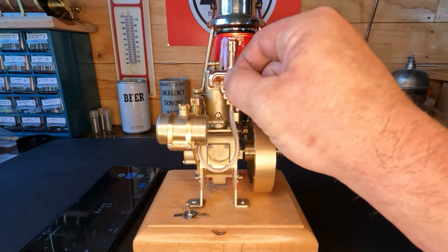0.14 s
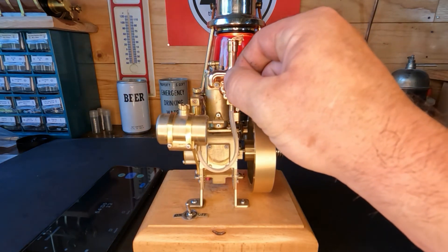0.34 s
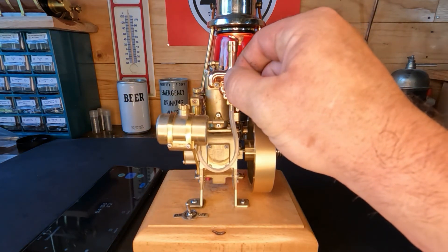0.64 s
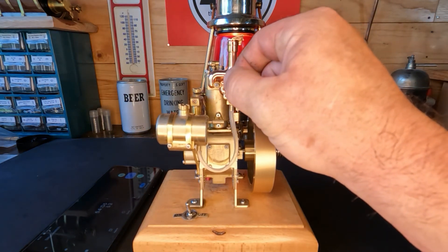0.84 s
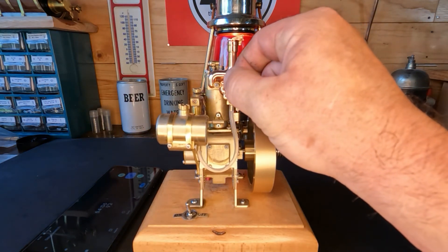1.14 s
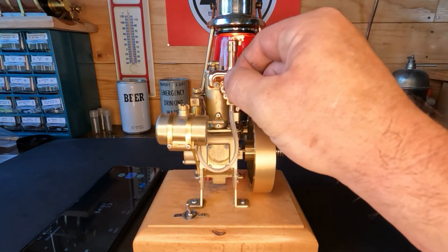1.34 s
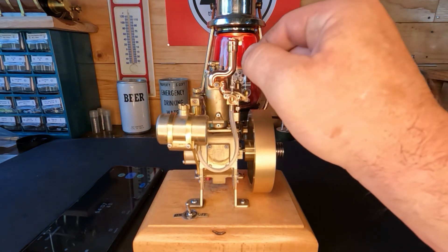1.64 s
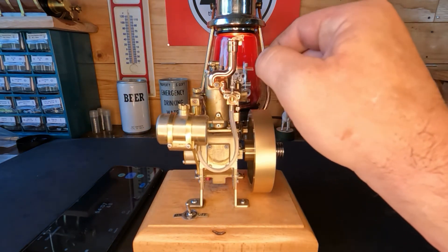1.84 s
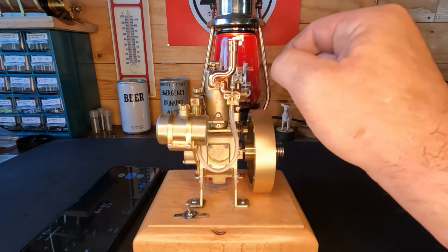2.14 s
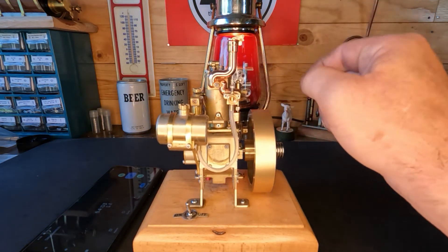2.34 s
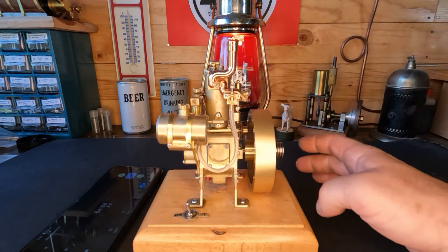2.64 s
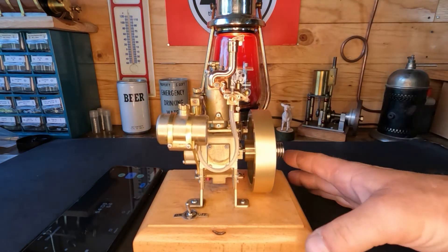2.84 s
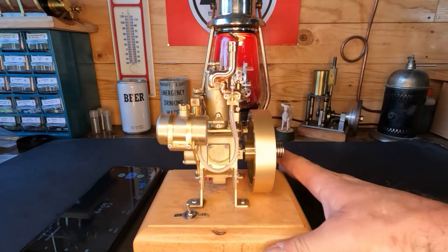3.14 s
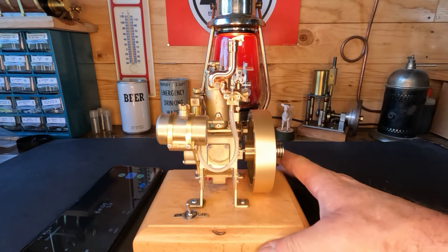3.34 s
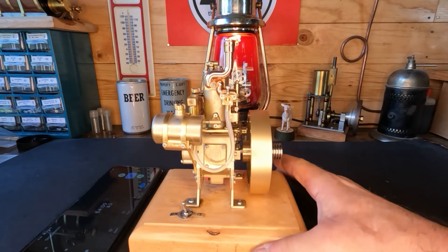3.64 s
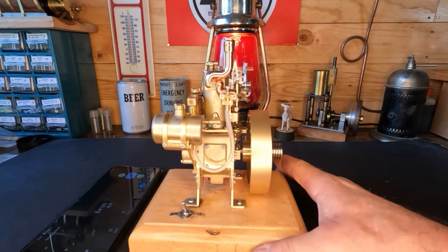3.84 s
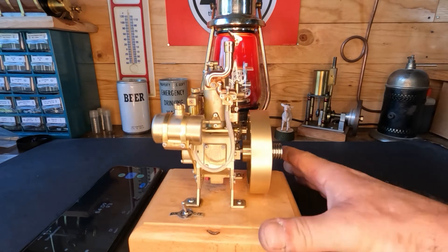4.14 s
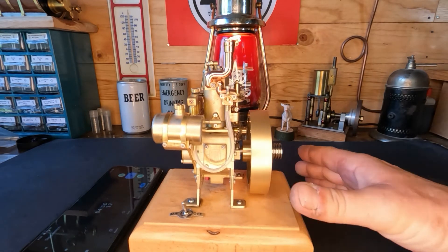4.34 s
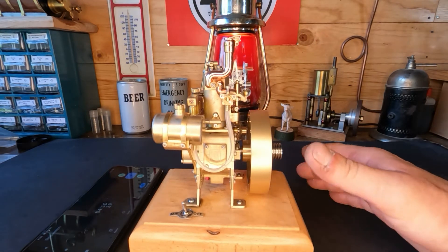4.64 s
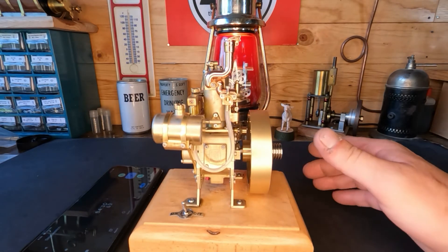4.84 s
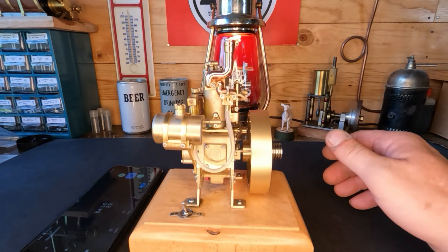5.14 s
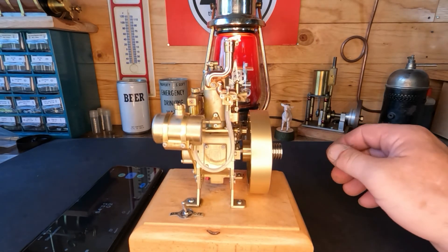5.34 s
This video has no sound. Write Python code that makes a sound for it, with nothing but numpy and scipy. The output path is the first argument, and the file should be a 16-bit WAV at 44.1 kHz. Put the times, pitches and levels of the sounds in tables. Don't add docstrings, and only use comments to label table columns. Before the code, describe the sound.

Up close, a tiny hit-and-miss engine pops rapidly, then slows to irregular cracks separated by soft chuffing, metallic ticks and valve snorts.

```python
import sys
import numpy as np
from scipy import signal
from scipy.fft import rfft, irfft, next_fast_len
from scipy.io import wavfile
from scipy.ndimage import uniform_filter1d, map_coordinates

SR = 44100
rng = np.random.default_rng(int(sys.argv[2]) if len(sys.argv) > 2 else 0)


def ratio_of_db(decibels):
    return 10 ** (np.asarray(decibels, float) / 20)


def output_pcm(signal):
    pcm = np.clip(np.atleast_2d(signal).T, -1, 1) * 32767
    wavfile.write(sys.argv[1], SR, np.round(pcm).astype(np.int16))


N = 241917
T = np.arange(SR // 6) / SR


def unit(x):
    return x / np.sqrt(np.mean(x ** 2) + 1e-20)


def along(points, hz):
    f, v = np.transpose(points)
    return np.interp(np.log(hz + 1), np.log(f + 1), v)


def wobble(rate):
    knots = rng.standard_normal(int(N * rate / SR) + 4)
    return map_coordinates(knots, [np.arange(N) * rate / SR])


def filtered(x, response):
    m = next_fast_len(x.shape[-1] + 8192)
    return irfft(rfft(x, m) * response(np.fft.rfftfreq(m, 1 / SR)), m)[..., :x.shape[-1]]


def resonant(x, peaks):
    def shape(f):
        total = 0
        for k, (center, width, db) in enumerate(peaks):
            damping = 1j * f * width
            total = total + (-1) ** k * ratio_of_db(db) * damping / (center * center - f * f + damping)
        return total
    return unit(filtered(x, shape))


def hiss(peaks, size):
    return resonant(rng.standard_normal(size), peaks)


def ring(modes, scatter_db, delay=0):
    t = np.clip(T - delay, 0, None)
    out = np.zeros(len(T))
    for hz, db, t60 in modes:
        level_db = db + scatter_db * rng.normal()
        out += ratio_of_db(level_db - 60 * t / t60) * np.sin(2 * np.pi * hz * t)
    return out


def burst(start, rise, t60):
    t = np.clip(T - start, 0, None)
    return (1 - np.exp(-t / rise)) * ratio_of_db(-60 * t / t60)


def add(out, s, sound):
    i = max(round(s * SR), 0)
    out[i:i + len(sound)] += sound[:len(out) - i]


# (frequency [Hz], level per Hz [dB])
AIR = [(25, -22), (58, -56), (250, -24), (754, -52), (1000, -7.5), (5000, -7), (11000, -15), (16000, -56)]


def still_air():
    return unit(filtered(rng.standard_normal((2, N)), lambda hz: ratio_of_db(along(AIR, hz))))


# (frequency [Hz], time to fall 60 dB [s])
SHOP = [(150, 0.14), (1000, 0.23), (10000, 0.073)]


def shop(x):
    hz, t, z = signal.stft(rng.standard_normal((2, SR // 3)), SR, nperseg=256)
    fade = ratio_of_db(-60 * t / along(SHOP, hz)[:, None])
    tail = signal.istft(z * fade, SR, nperseg=256)[1]
    late = np.pad(x, (220, 0))[None]
    return signal.fftconvolve(late, tail / np.linalg.norm(tail[0]), axes=1)[:, :N]


FIRED = [2, 4, 6, 8, 10, 18, 26, 33, 42, 43, 53, 56, 68, 69]


def cam():
    pop_lag_s, sag_per_s2 = .0205, 2.5
    ticks = [(pop[0] - pop_lag_s, n) for pop, n in zip(POPS, FIRED)]
    first, last = (-.077, -1), (5.569, 75)
    s, turns = np.transpose([first, *ticks, last])
    t = np.arange(N) / SR
    k = np.searchsorted(s, t) - 1
    since, span = t - s[k], np.diff(s)[k]
    even = turns[k] + np.diff(turns)[k] * since / span
    return even + sag_per_s2 / 2 * since * (span - since)


def sealed():
    depth_db, cycle = np.zeros(N), cam()
    seal_db = -15

    def hush(length, db):
        return db * np.sin(np.pi * np.clip(T / length, 0, 1)) ** .5

    for s, *_ in SNORTS:
        at = cycle[round(s * SR)]
        if .35 < at % 1 < .9:
            shut = s + .014
            opens = np.searchsorted(cycle, np.ceil(at) + .12) / SR
            add(depth_db, shut, hush(opens - shut, seal_db))
    for k in np.flatnonzero(np.diff(FIRED) == 1):
        add(depth_db, POPS[k + 1][0], hush(.1, -14))
    for s, *_ in POPS:
        add(depth_db, s + .008, hush(.045, -6))
    return ratio_of_db(np.maximum(depth_db, seal_db - 4))


# (time [s], level [dB])
BREATH = [(0.0, -50.5), (0.78, -49), (1.11, -44), (1.39, -44), (1.59, -42), (2.9, -41), (3.11, -40.5),
          (3.25, -42), (3.42, -44), (3.6, -43.5), (4.59, -41), (4.95, -41.5), (5.14, -44.5), (5.48, -43)]
# (place [cycles], width [cycles], port level [dB], pipe level [dB], gear level [dB])
STROKES = [
    (.1, .05, -3, -9, -7),
    (.2, .03, -16, -7, -9),
    (.36, .04, 0, 1, 0),
    (.44, .03, -5, -9, -6),
    (.6, .055, -2, -5, -3),
    (.9, .04, -1, -10, -4),
]
# (beats [per cycle], level [dB], lead [turns])
PUMP = [(1, -24, 0), (2, 0, .24), (4, -4.5, -.1), (6, -17, -.29), (8, -20, -.1), (10, -22, .2)]
# (frequency [Hz], width [Hz], level [dB])
PORT = [(3420, 1150, -6), (5263, 770, 0.5), (6280, 650, -8), (7465, 750, -0.5), (9380, 590, -12.5),
        (10690, 760, -11), (12140, 1500, -19.5)]
# (frequency [Hz], width [Hz], level [dB])
PIPE = [(147.6, 26, -2), (360.6, 55, -7.5), (524, 84, -11), (949.5, 110, 2.5)]
# (frequency [Hz], width [Hz], level [dB])
GEAR = [(1250, 400, -2.5), (1860, 360, -0.5), (2633, 395, -5), (3840, 500, -13)]
# (frequency [Hz], level [dB], time to fall 60 dB [s])
TICK = [(6350, 0, .013), (5500, -3, .01), (7500, -1, .01), (2000, -3, .012), (1000, -8, .02),
        (370, -12, .03), (620, -10, .02), (10600, -10, .006)]
# (frequency [Hz], level [dB], time to fall 60 dB [s])
TOCK = [(5400, 2, .016), (6400, -8, .01), (1000, -6, .02), (2000, -2, .012), (370, -7, .03), (620, -5, .02),
        (10600, -9, .006)]


def coasting():
    cycle, sealed_gain = cam(), sealed()
    flow_db = np.interp(np.arange(N) / SR, *np.transpose(BREATH))
    flow_db = flow_db - flow_db.mean()
    port_db, pipe_db = -41 + flow_db, -40 + .52 * flow_db
    gear_db, pump_db = -42.5 + .97 * flow_db, -34.5 + .44 * flow_db

    gates = ratio_of_db([[-15], [-9], [-4]]) * np.ones((3, N))
    for at, width, *level_db in STROKES:
        off = (cycle - at + .5) % 1 - .5
        gates += ratio_of_db(level_db)[:, None] * np.exp(-.5 * (off / width) ** 2)

    jets = np.zeros(N)
    for hz, width, db in PORT:
        flutter = ratio_of_db(db + 3 * wobble(220)) * np.sqrt(width)
        jets += flutter * resonant(hiss([(hz, width, db)], N), [(hz, 3 * width, 0)])
    port = ratio_of_db(port_db) * unit(gates[0] * jets)
    block_hum = ratio_of_db(-13) * np.sqrt(gates[2]) * hiss(PIPE[:3], N)
    pipe = ratio_of_db(pipe_db) * unit(gates[1] * hiss(PIPE[3:], N) + block_hum)
    gear = ratio_of_db(gear_db) * unit(gates[2] * ratio_of_db(.73 * wobble(250)) * hiss(GEAR, N))
    pump = np.zeros(N)
    for beats, db, lead in PUMP:
        pump += ratio_of_db(db + wobble(5.1)) * np.cos(2 * np.pi * (beats * cycle + lead))
    out = sealed_gain * port + sealed_gain ** .6 * gear + pipe + ratio_of_db(pump_db) * unit(pump)

    contact = np.floor(2 * (cycle + .025))
    for i in np.flatnonzero(np.diff(contact)):
        second = contact[i + 1] % 2
        level = ratio_of_db(port_db[i] + 19 - 4 * second) * sealed_gain[i]
        click = ring(TOCK if second else TICK, 1.8)
        add(out, i / SR, level * burst(0, .0006, .024) * click)
    return out


# (time [s], level [dB])
LATCH_SLIPS = [
    (3.159, -26),
    (5.024, -22),
]


def leaks():
    out = np.zeros(N)
    lead_s = .017
    window = burst(0, .0012, .12) * np.clip((lead_s - T) / .004, 0, 1)
    lifts = [(s - lead_s, leak_db) for s, *_, leak_db in POPS]
    for s, *_ in PUFFS:
        if any(.03 < s - snap[0] < .065 for snap in SNORTS):
            lifts.append((s - lead_s, -29.5))
    for s, db in lifts + LATCH_SLIPS:
        jet_db = min(-29, db - 4.5)
        song = ratio_of_db(db - 9.5) * hiss(PIPE[3:], len(T))
        jet = ratio_of_db(jet_db - 7.5) * hiss(GEAR, len(T)) + ratio_of_db(jet_db - 14.5) * hiss(PORT, len(T))
        add(out, s, window * (song + jet))
    return out


# (time [s], puff level [dB], rasp level [dB], thud level [dB])
PUFFS = [(0.03, -20.5, -4, -17), (0.119, -23.5, -1.5, -18), (0.298, -21, -6, -23), (0.468, -21.5, -4, -14),
         (0.631, -26.5, -2, -9), (0.789, -22.5, -3, -14), (1.386, -21.5, 1, -16), (1.978, -20, -4, -11),
         (2.125, -19.5, -1.5, -18), (3.369, -22.5, -4, -20), (3.847, -19.5, -8, -7.5), (3.95, -24, 1, -19),
         (4.507, -19.5, -2.5, -17), (4.862, -14, -31, -9), (5.231, -23.5, -6, -16)]


def puffs():
    out = np.zeros(N)
    for s, db, rasp_db, thud_db in PUFFS:
        push = ring([(232, -3, .0067), (514, -8, .0093)], .97, .0021)
        suction = ring([(107, 3.5, .03), (65, -2, .065)], 1, .0032)
        thud = ratio_of_db(thud_db + 5.5) * (push - suction)
        knock_modes = [(422, 12.1, .012), (832, 6.6, .011), (1250, 2.8, .019)]
        knock = burst(.0029, .0022, .24) * ring(knock_modes, 2.3, .00334)
        rasp = burst(.0005, .0043, .033) * hiss(GEAR + THROAT, len(T))
        add(out, s, ratio_of_db(db + 2.5) * (thud + ratio_of_db(rasp_db + .5) * (knock + ratio_of_db(.5) * rasp)))
    return out


# (time [s], ring level [dB], ring frequency [Hz], flutter level [dB])
SNORTS = [(0.051, -31, 1320, -32.5), (0.1436, -30, 1250, -32.5), (0.2367, -37, 1460, -40),
          (0.322, -30.5, 1250, -33), (0.407, -37, 1430, -37.5), (0.492, -30, 1280, -33.5),
          (0.573, -37, 1440, -40), (0.6546, -30.5, 1250, -33.5), (0.7404, -27, 1370, -38),
          (0.81, -23, 1325, -32), (1.346, -31.5, 1280, -52), (1.407, -25, 1380, -32),
          (1.974, -22.5, 1250, -35), (2.0013, -19, 1340, -30.5), (2.0806, -22, 1345, -34.5),
          (2.5218, -18.5, 1324, -30), (3.179, -19, 1320, -30), (3.249, -24, 1430, -33),
          (3.329, -30, 1390, -47), (3.932, -24, 1330, -29.5), (3.9719, -20, 1280, -30.5),
          (4.191, -20, 1320, -32), (4.466, -20.5, 1326, -34.5), (5.0417, -17.5, 1344, -30),
          (5.1133, -25.5, 1420, -34.5), (5.1936, -35, 1410, -51)]
# (frequency [Hz], width [Hz], level [dB])
THROAT = [(215, 116, 7.5), (464, 303, 3.5), (860, 230, -0.5), (1460, 1010, -4.5)]


def snorts():
    out = np.zeros(N)
    for s, db, hz, drawn_db in SNORTS:
        flutter_db = drawn_db - db
        edge_db = -8 - .0512 * (hz - 1320)
        length = .024 - .0006 * max(-flutter_db, 0)
        draw = np.sin(np.pi * np.clip(T / (length + .0035), 0, 1)) ** .47

        gaps = SR / 205 / (1 + .05 * np.arange(24)) * rng.uniform(.93, 1.07, 24)
        slaps = np.zeros(len(T))
        slaps[np.cumsum(gaps).astype(int)] = ratio_of_db(1.8 * rng.standard_normal(24))
        slapping = resonant(uniform_filter1d(slaps, size=9), THROAT)
        flutter = draw * (slapping + .45 * hiss(THROAT, len(T)))
        air = ratio_of_db(flutter_db - 14) * draw * hiss(GEAR + PORT, len(T))

        tone_modes = [(hz, 7, .03), (.927 * hz, -1, .03), (1.046 * hz, -2, .025)]
        tone = burst(.00024, .00083, .88) * ring(tone_modes, .7, .00032)
        clink = ring([(4070, -.75, .027), (4020, .2, .017)], .8, .0007)
        spit = ratio_of_db(4.5) * burst(.0005, .00056, .011) * hiss(CRACK, len(T))
        snap = tone + ratio_of_db(edge_db) * (clink + spit) + ratio_of_db(flutter_db + 1) * flutter + air
        gulp = ratio_of_db(drawn_db + 4) * ring([(130, 0, .05), (85, -3, .07)], 2, .002)
        add(out, s, ratio_of_db(db) * snap - gulp)
    return out


# (time [s], bark level [dB], crack level [dB], valve leak level [dB])
POPS = [(0.2132, -17, -14, -26), (0.389, -16.5, -15.5, -26), (0.555, -16, -15, -22), (0.716, -16, -15, -25),
        (0.8683, -17, -16.5, -24), (1.4661, -13.5, -17.5, -16), (2.058, -13, -17.5, -16.5),
        (2.575, -12.5, -16.5, -28), (3.2326, -12, -19, -15.5), (3.3018, -10, -15.5, -20),
        (4.0295, -13.5, -17.5, -22.5), (4.2424, -12, -18, -18), (5.0957, -12.5, -19, -14),
        (5.1653, -10.5, -14, -27)]
# (frequency [Hz], level [dB], time to fall 60 dB [s])
BARK = [(1260, 2, 0.0088), (1610, -3, 0.0039), (950, -20.5, 0.13)]
# (frequency [Hz], width [Hz], level [dB])
CRACK = [(2020, 190, 2.5), (3600, 1020, -6), (4540, 410, 0), (6100, 410, 8.5), (7690, 280, 10),
         (9200, 1270, -1.5), (11600, 1660, -0.5)]
# (frequency [Hz], level [dB], time to fall 60 dB [s])
SHELL = [(2290, -9, 0.0057), (3270, -1.5, 0.0085), (4930, -9, 0.0077), (6120, -5, 0.0055),
         (7710, -14.5, 0.0054), (9860, -7, 0.0067), (11740, -23, 0.0076)]
# (frequency [Hz], level [dB], time to fall 60 dB [s])
PUSH = [(257.4, 6, 0.016), (349, -9.5, 0.052), (553, -16.5, 0.051)]
# (frequency [Hz], level [dB], time to fall 60 dB [s])
SUCTION = [(50.5, -9.5, 0.14), (100, 12, 0.013)]
# (frequency [Hz], level [dB], time to fall 60 dB [s])
BLOCK = [(145, 0, 0.25), (166, 3, 0.09), (237.3, -5, 0.089), (112, 0, 0.12), (82, -1, 0.14)]


def pops():
    out = np.zeros(N)
    lag = .002
    for s, db, crack_db, _ in POPS:
        bark = ratio_of_db(db + 8) * burst(.00074, .00032, .06) * ring(BARK, .44, .00072)
        jet = burst(.0011, .0006, .008) * hiss(CRACK, len(T))
        mouth = burst(.001, .00082, .018) * ring(SHELL, 1.66, .001016)
        crack = ratio_of_db(crack_db + 10) * (jet + mouth)
        hum = ratio_of_db(-14) * ring(BLOCK, 2.6, lag)
        push = ratio_of_db(-12.5) * (ring(PUSH, 1, lag) - ring(SUCTION, .63, lag) + hum)
        wake = ratio_of_db(db - 37) * burst(.0035, .00084, .052) * hiss(GEAR + PORT, len(T))
        add(out, s, bark + crack + push + wake)
    return out


# (frequency [Hz], level [dB])
SIDE_DB = [(40, -57), (400, -18.5), (700, -15), (1300, -20), (2400, -2.5), (5500, -6), (9000, -17),
           (14000, 0)]
# (frequency [Hz], level [dB])
LEAN = [(60, 1.4), (500, 1), (1400, -.2), (2800, .4), (5600, -.8), (11000, -2.8)]


def ports(x):
    z = signal.stft(x, nperseg=128)[2]
    scatter = np.exp(2j * np.pi * rng.random(z.shape))
    side = signal.istft(z * scatter, nperseg=128)[1][:N]
    side = filtered(side, lambda hz: ratio_of_db(along(SIDE_DB, hz) - 2.5))

    def lean(hz):
        left_over_right = ratio_of_db(along(LEAN, hz)) * np.exp(2j * np.pi * hz * 1.5e-5)
        return left_over_right ** np.array([[.5], [-.5]])

    return filtered(np.array([x + side, x - side]), lean)


def scene():
    engine = coasting() + leaks() + puffs() + snorts() + pops()
    air = ratio_of_db(-46) * np.sqrt(sealed()) * still_air()
    return ports(engine) + ratio_of_db(-23) * shop(engine) + air


def roll_off(x):
    return signal.sosfilt(signal.butter(12, 16480, fs=SR, output="sos"), x)


def record(dry):
    heard = filtered(dry, lambda hz: (hz > 8) / (1 + (hz / 14800) ** 16))
    top = 1.15
    mix = heard / (1 + np.abs(heard / top) ** 6) ** (1 / 6)
    return roll_off(mix)


dry = scene()
out = record(dry)
output_pcm(out)
```